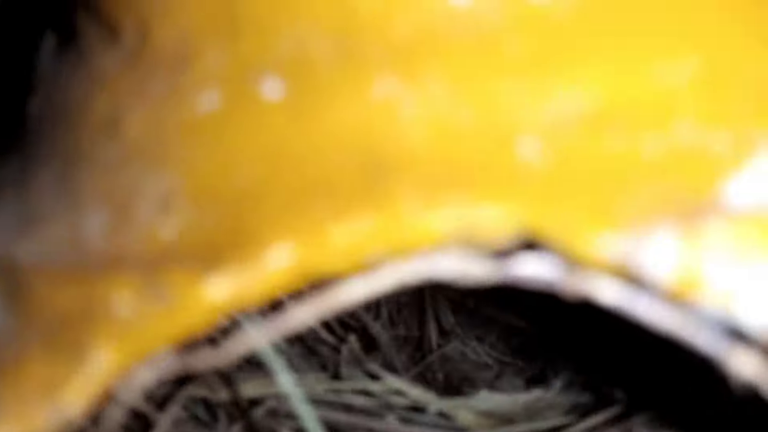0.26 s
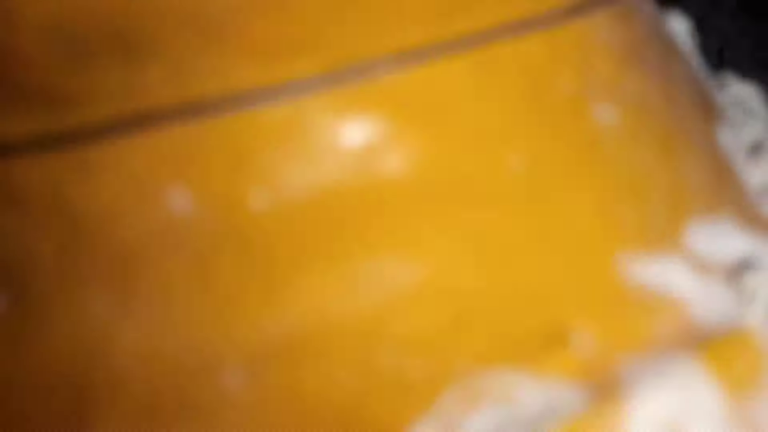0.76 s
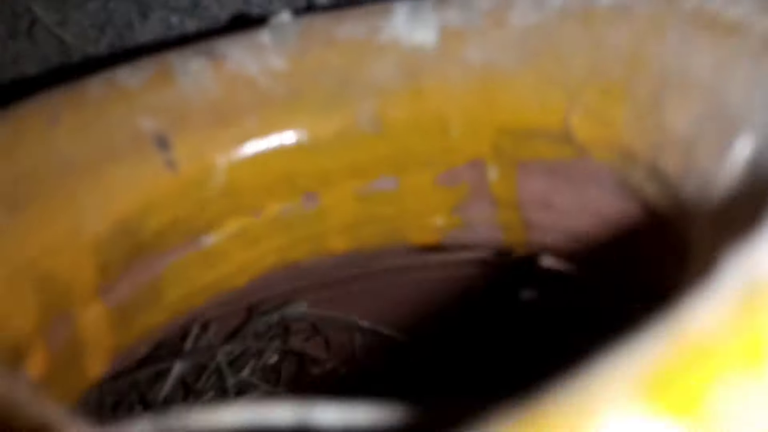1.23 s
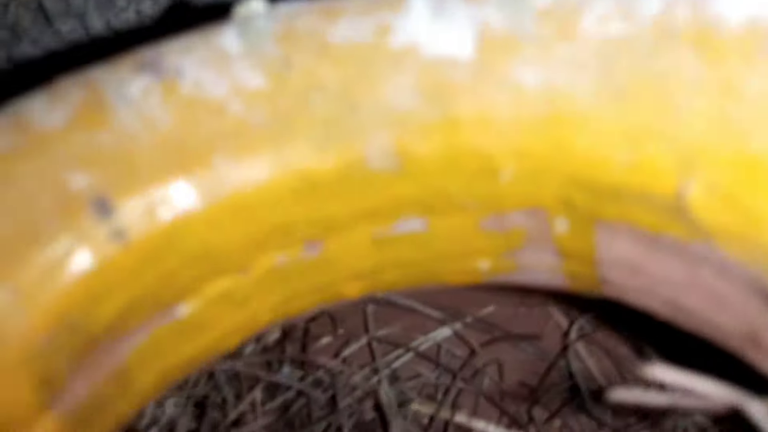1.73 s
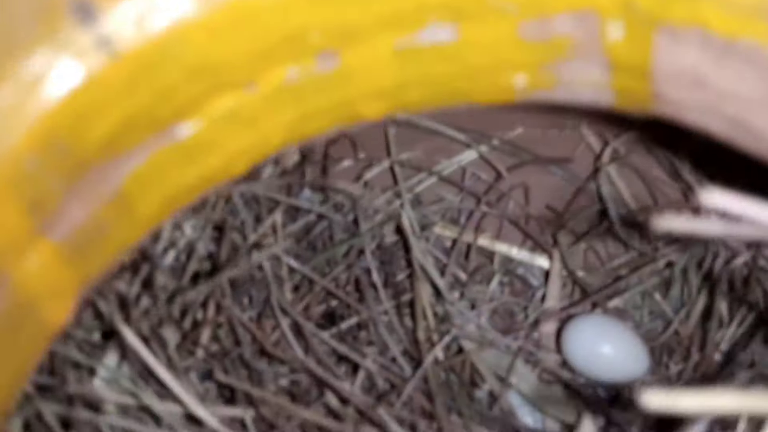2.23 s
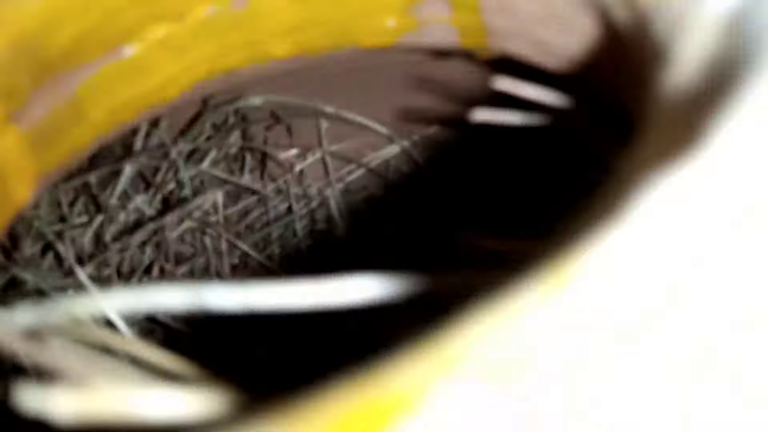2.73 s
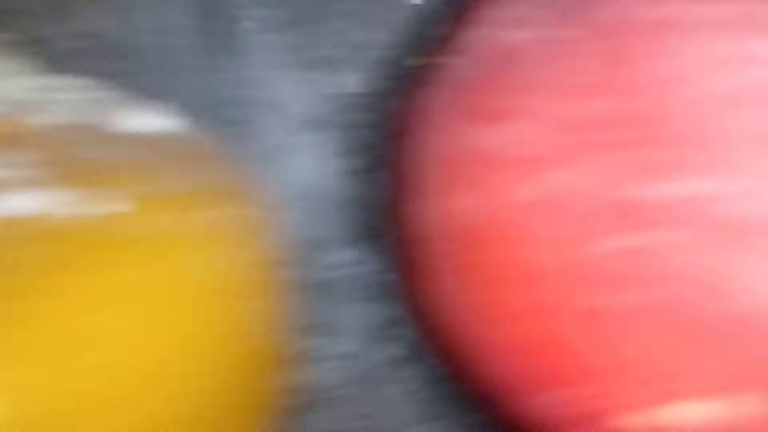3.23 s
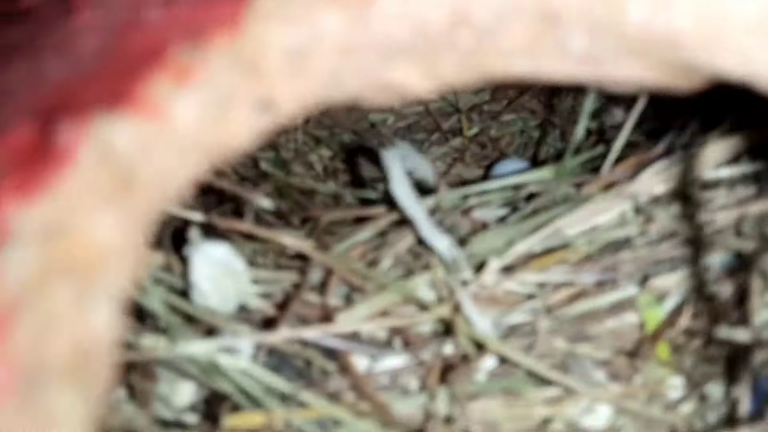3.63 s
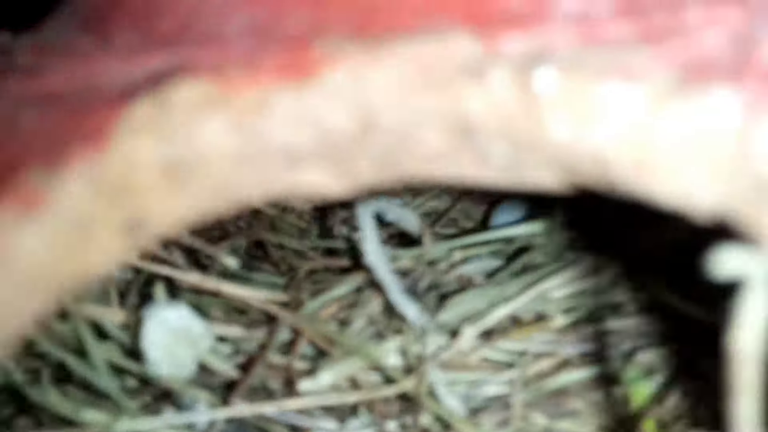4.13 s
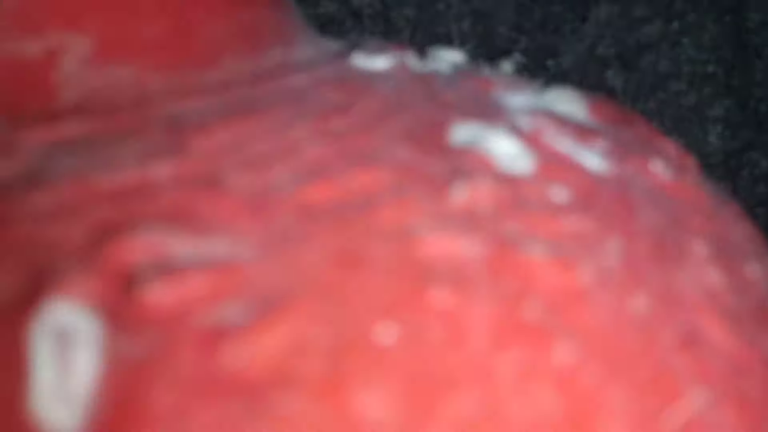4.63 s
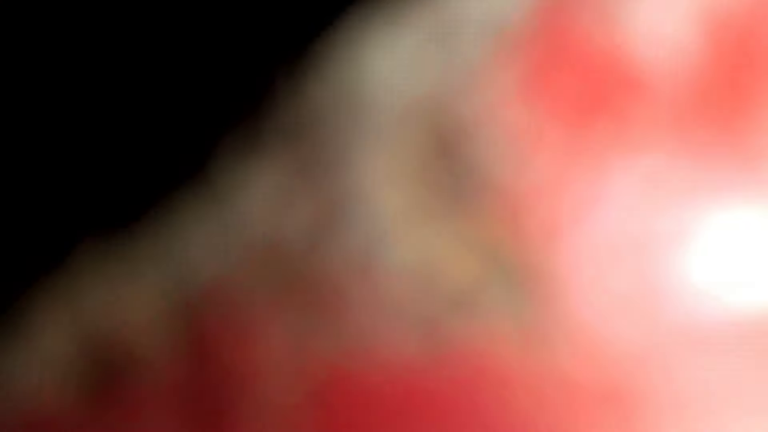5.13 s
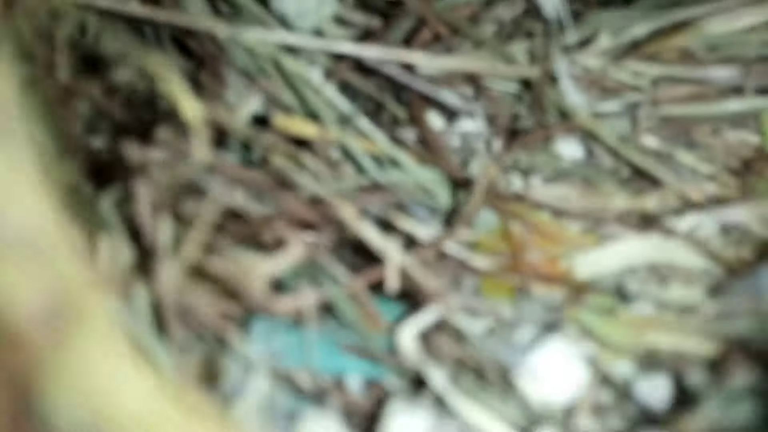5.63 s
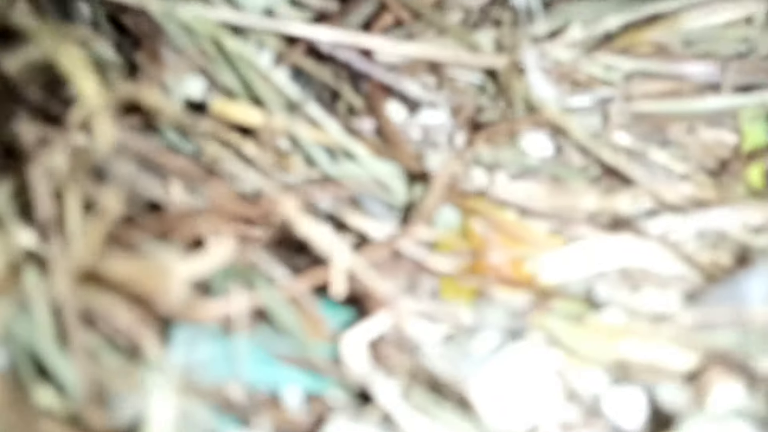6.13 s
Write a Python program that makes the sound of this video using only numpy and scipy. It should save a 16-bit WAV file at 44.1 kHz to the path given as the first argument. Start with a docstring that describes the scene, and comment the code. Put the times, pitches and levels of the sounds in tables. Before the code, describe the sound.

Thin chirps and grainy wing flaps echo off hard walls, with a rattling thud, dull clay knocks, and a busier, brighter finish.

```python
"""Small birds calling at a small microphone in a hard-walled aviary: whistles, cheeps, squawks, hoarse rasps.
Calls are gliding overtone stacks, rougher and breathier when harsh; wing beats are puffs of grainy hiss.
Close by, feet set clay nest pots ringing, and one heavy thud adds a sharp blow and rattling noise bands.
Behind lie moving air with low hollow notes, the soft flutter of many wings and the blur of far birds, all as
filtered noise; calls, wings and knocks echo off the walls, and the microphone's port brightens the top treble."""
import sys
import numpy as np
from scipy import signal
from scipy.fft import rfft, irfft
from scipy.io import wavfile
from scipy.ndimage import uniform_filter1d

SR = 44100
rng = np.random.default_rng(int(sys.argv[2]) if len(sys.argv) > 2 else 0)


def transcribe(u):
    """Save the signal u as a 16-bit wav file named by the first command-line argument.

    u: samples, shape (n,) or (channels, n), limited to [-1, 1]; the rate is SR.
    q: integer samples, one column per channel.
    """
    v = np.clip(np.atleast_2d(u).T, -1, 1)
    q = np.round(v * 32767).astype(np.int16)
    wavfile.write(sys.argv[1], SR, q)


def volts_from_db(level):
    """Convert decibel levels to linear amplitude ratios."""
    exponent = np.asarray(level, float) / 20
    return 10 ** exponent


N = 280476   # samples

# spectrum of bird breath and far chatter: [f/Hz, relative level/dB]
CHATTER_SPECTRUM = [(1200, -22.5), (2000, 1), (4000, 8.5), (7000, 6.5), (8500, -3.5), (16000, -20)]


def rms_one(x):
    """Scale to rms 1."""
    return x / np.sqrt(np.mean(x ** 2) + 1e-20)


def at_hz(points, hz):
    """Read a table on a log-frequency axis."""
    table = np.array(points)
    return np.interp(np.log(np.maximum(hz, 1)), np.log(table[:, 0]), table[:, 1])


def coloured(spectrum):
    """Steady noise with the given spectrum, rms 1."""
    shape = volts_from_db(at_hz(spectrum, np.fft.rfftfreq(N, 1 / SR)))
    return rms_one(irfft(rfft(rng.standard_normal(N)) * shape, N))


def drift(rate_hz):
    """Slow chance: noise twice through a one-pole low-pass, rms 1."""
    r = np.exp(-2 * np.pi * rate_hz / SR)
    wander = signal.lfilter([1], [1, -2 * r, r * r], rng.standard_normal(N + SR))
    return rms_one(wander[SR:])   # the first second only settles the filter


def ring(clicks, hz, t60):
    """A two-pole resonance: a unit click starts a sine of height about 1 that falls 60 dB in t60 seconds."""
    r, w = volts_from_db(-60 / (t60 * SR)), 2 * np.pi * hz / SR
    return signal.lfilter([0, np.sin(w)], [1, -2 * r * np.cos(w), r * r], clicks + 1e-18)


def clicks_at(seconds, sizes):
    """One sample per event."""
    return np.bincount(np.round(np.array(seconds) * SR).astype(int), sizes, N)[:N]


def chirps():
    """Gliding overtone stacks; a harsh call wavers more in pitch and strength and carries breath."""
    # calls by kind: [t/s, length/s, start f/Hz, end f/Hz, relative level/dB]
    whistles = [(1.412, 0.086, 2795, 3032, -39), (1.48, 0.078, 3020, 3510, -42.5),
                (2.04, .025, 3400, 3330, -42), (2.615, 0.06, 6530, 6610, -42.5),
                (3.057, 0.013, 1890, 2600, -31.5), (3.108, 0.013, 2586, 1800, -30),
                (3.124, 0.013, 1820, 2330, -38), (3.154, 0.0146, 4370, 6320, -22),
                (3.163, 0.047, 6370, 6270, -38), (3.171, 0.019, 5530, 5490, -37),
                (3.261, 0.01, 1640, 2830, -28), (3.27, 0.011, 2830, 1690, -34.5),
                (3.321, 0.029, 3060, 3083, -31.5), (3.494, 0.023, 2620, 2610, -44),
                (3.503, 0.0089, 6430, 6500, -42), (4.62, 0.011, 3120, 3080, -41.5),
                (5.213, 0.037, 5570, 5600, -16.5), (5.367, 0.04, 5980, 5320, -30.5),
                (5.475, 0.03, 3530, 3430, -47)]
    cheeps = [(.083, 0.033, 1734, 1840, -41), (.1, 0.026, 2090, 1985, -35), (.098, 0.044, 6270, 5775, -27),
              (.558, 0.037, 2647, 2529, -32), (.775, 0.015, 7160, 6930, -31),
              (.938, 0.044, 1777, 1800, -48.5), (1.01, 0.014, 2060, 2080, -51),
              (1.079, 0.025, 2126, 2280, -44), (1.156, 0.027, 2040, 2034, -42),
              (1.233, 0.022, 2072, 2008, -40), (1.322, 0.012, 2014, 2010, -41),
              (1.565, 0.09, 3256, 2806, -32), (2.815, 0.01, 6580, 5950, -44),
              (3.027, 0.039, 1815, 1970, -37), (3.655, 0.051, 2955, 3300, -29.5),
              (3.97, 0.056, 1914, 1930, -41.5), (4.282, 0.0276, 2106, 2286, -34),
              (4.35, 0.056, 2906, 2910, -25.5), (4.374, 0.028, 3160, 3124, -26),
              (4.399, 0.039, 3000, 2997, -26), (4.842, 0.054, 3130, 3240, -29),
              (4.88, 0.0496, 3130, 3077, -26.5), (4.915, 0.039, 3020, 2740, -45),
              (5.003, 0.074, 2970, 3096, -29), (5.775, 0.023, 4240, 4220, -32),
              (5.782, 0.037, 4800, 4760, -34.5), (6.019, 0.021, 6860, 6720, -29),
              (6.085, 0.057, 4150, 4430, -40), (6.157, 0.035, 6470, 7230, -17),
              (6.288, 0.035, 2293, 2280, -32.5), (6.3, 0.027, 5170, 5600, -17.5),
              (6.306, 0.028, 7200, 6700, -15)]     # reedy: the low ones rich in overtones, the high ones nearly single tones
    squawks = [(.546, 0.036, 2680, 2560, -29), (.674, 0.031, 2945, 3023, -35),
               (3.545, 0.025, 1770, 1800, -47), (3.565, 0.05, 1835, 2980, -47),
               (3.607, 0.033, 3520, 3670, -45), (4.083, 0.013, 2386, 2420, -37),
               (4.12, 0.023, 2200, 2390, -38), (5.035, 0.049, 2990, 2605, -31.5),
               (5.804, 0.06, 3950, 3850, -34), (5.838, 0.042, 4350, 3600, -39),
               (.87, 0.046, 3360, 3600, -53), (5.78, 0.08, 2300, 2550, -38),
               (5.808, 0.072, 2000, 1870, -37)]   # rough, mostly weak in overtones
    rasps = [(.1, 0.037, 4800, 5120, -37), (.68, 0.032, 6170, 5780, -44.5),
             (3.041, 0.053, 4700, 4900, -39.5), (3.087, 0.12, 4010, 3564, -40.5),
             (3.105, 0.034, 1812, 1857, -40), (3.765, 0.025, 2973, 3695, -39),
             (3.833, 0.03, 2634, 2930, -42), (3.891, 0.03, 2710, 3080, -39.5),
             (3.955, 0.041, 6550, 5810, -34.5), (3.99, 0.029, 4310, 3660, -37),
             (4.018, 0.026, 3920, 4670, -35.5), (4.083, 0.02, 4120, 4780, -31),
             (4.12, 0.041, 4150, 4450, -37), (4.142, 0.037, 6190, 5650, -34),
             (4.514, 0.0078, 6840, 6300, -41.5), (4.218, 0.0096, 2570, 2420, -44),
             (.563, 0.042, 3500, 3300, -38.5), (5.18, 0.02, 3224, 2945, -28.5),
             (6.009, 0.026, 2633, 2504, -36.5), (6.15, 0.043, 2660, 2760, -35)]       # hoarse
    low_tone = [(4.4, 0.33, 750, 715, -44), (4.725, .11, 720, 718, -42)]   # faint and wavering, from far off
    # overtone slope against the starting pitch: [f/Hz, slope/dB per overtone]
    thin_voice = [(750, -11), (1750, -18), (4300, -8), (5300, 4)]
    full_voice = [(1780, -2), (2100, 0.5), (2650, 6.5), (2950, 8.5), (3200, -1.5), (4000, -0.5), (4700, 6),
                  (7000, -14)]
    # pass band of the beak: [f/Hz, gain/dB]
    beak = [(1500, -3.5), (7000, 1.5), (8200, -23.5), (15000, -15.5)]
    clear, reedy, rough, hoarse = .24, .44, .65, .88   # harshness, 0-1
    kinds = [(whistles, clear, thin_voice), (cheeps, reedy, full_voice), (squawks, rough, thin_voice),
             (rasps, hoarse, full_voice), (low_tone, reedy, thin_voice)]

    out, waver, breath = np.zeros(N), drift(214), coloured(CHATTER_SPECTRUM)
    throb_db = 6.0 * drift(170).clip(-3, 1.3)
    for calls, harsh, voice in kinds:
        for s, length, start_hz, end_hz, level_db in calls:
            at = np.arange(round(s * SR), min(N, round((s + length) * SR)))
            way = (at / SR - s).clip(0) / length
            glide = 1 - (1 - way) ** 1.606   # quick at first, then settling
            pitch_hz = (start_hz + (end_hz - start_hz) * glide) * (1 + .062 * harsh * waver[at])
            turns = np.cumsum(pitch_hz) / SR
            rise = 0.093 + 1.05 * (1 - harsh) ** 2   # harsh calls burst out, clear ones swell
            swell = np.minimum(way / rise, (1 - way).clip(0) / 0.36).clip(0, 1)
            swell = swell * volts_from_db(level_db + throb_db[at] * np.sqrt(harsh))
            out[at] += swell * harsh ** 4 * breath[at]
            slope_db = at_hz(voice, start_hz)
            for k in range(1, int(14000 / max(start_hz, end_hz)) + 1):
                steps = min(k, 7500 / start_hz) - 1   # the slope holds up to the beak's pass band
                overtone_db = slope_db * steps + at_hz(beak, k * start_hz)
                out[at] += swell * volts_from_db(overtone_db) * np.sin(2 * np.pi * k * turns)
    return out


def wings():
    """Each beat is a grainy puff of feather hiss; strong strokes swell and die more slowly; far wings come at random."""
    # near wing beats: [t/s, relative treble level/dB]
    beats = [(0.156, -26.5), (.238, -35), (.344, -35), (0.459, -30.5), (0.528, -30), (0.572, -27.5),
             (0.945, -32), (0.971, -31.5), (1.132, -30.5), (1.224, -29.5), (1.393, -37.5), (1.521, -31.5),
             (1.556, -34), (1.741, -35.5), (1.826, -34), (1.907, -31.5), (1.96, -31), (1.997, -33.5),
             (2.043, -30.5), (2.205, -29), (2.288, -36.5), (2.511, -32), (2.554, -30.5), (2.593, -27.5),
             (2.82, -34.5), (2.842, -27.5), (2.915, -26.5), (3.122, -21.5), (3.144, -25), (3.229, -28),
             (3.308, -31), (3.334, -28.5), (3.397, -25), (3.445, -32.5), (3.621, -30), (3.649, -21),
             (3.907, -28.5), (3.953, -31), (4.259, -32), (4.316, -29.5), (4.358, -25), (4.465, -33.5),
             (4.514, -32), (4.727, -32), (5.028, -26), (5.051, -23.5), (5.086, -26), (5.127, -19.5),
             (5.149, -31), (5.567, -22.5), (5.659, -31.5), (5.914, -30.5), (6.015, -34), (6.068, -31),
             (6.296, -19)]
    # feather hiss, middle and top: [f/Hz, relative level/dB]
    feather_mid = [(300, -3.5), (1500, 5.5), (3000, 4), (7500, 8.5), (9000, -31)]
    feather_top = [(5000, -47), (7500, -5.5), (16000, -2)]
    rise_s, fall_s = 0.0049, 0.0081   # time constants of a -31.5 dB stroke
    stretch = 0.33                    # share of the level difference that lengthens a stroke
    far_per_s, far_db = 2, -47
    mid_db, mid_spread_db = -2.5, 1.8   # middle band against the treble, and its wandering

    far = [(s, far_db) for s in rng.uniform(0, N / SR, round(far_per_s * N / SR))]
    t, top = np.arange(SR // 10) / SR, np.zeros(N + SR)
    for s, treble_db in [*beats, *far]:
        slow = volts_from_db(stretch * (treble_db + 31.5))
        start = max(0, round((s - rise_s * (slow - 1)) * SR))   # a slower rise begins earlier
        puff = (1 - np.exp(-t / slow / rise_s)) * np.exp(-t / slow / fall_s)
        top[start:start + len(t)] += volts_from_db(treble_db) * puff
    top = top[:N]
    mid = top * volts_from_db(mid_db + mid_spread_db * drift(11.0))
    grain = volts_from_db(3.0 * drift(150))
    return grain * (top * coloured(feather_top) + mid * coloured(feather_mid))


def pots():
    """A foot lands with a second, weaker touch; hardness tilts the upper modes, and some landings catch the rim."""
    # feet on the pots: [t/s, relative level/dB, hardness/dB per octave above 260 Hz, rim against the blow/dB]
    knocks = [(0.391, -32, -17, -14), (0.511, -42, 9, -6), (.536, -30.5, -15, -20), (.55, -22.5, -25, -24),
              (0.566, -18, -29, -23), (0.587, -25, -21, -33), (1.52, -50, 18.5, -22),
              (1.983, -54.5, 25.5, 9), (3.344, -25.5, -2.5, 6), (3.904, -31, 11.5, 6),
              (4.052, -27.5, -33, -30), (5.524, -57, 29.5, 17), (6.0, -15.5, -53, -35),
              (6.174, -18.5, 10, -9)]
    # modes of the clay body, then of the glazed rim: [f/Hz, relative level/dB, t60/s]
    body_modes = [(215.6, -11.5, 0.33), (280.5, 5, 0.055), (328, -3.5, 0.064), (418, 1, 0.034),
                  (485, -3, 0.067), (870, -10.5, 0.0047)]
    rim_modes = [(1430, -7, 0.27), (1591, -12.5, 0.1)]
    s, blow_db, hard_db, rim_db = np.transpose(knocks)
    out, later = 0, rng.uniform(0.0045, 0.0109, len(s))   # delay of the second touch, s
    for hz, level_db, t60 in body_modes:
        sizes = volts_from_db(blow_db + level_db + hard_db * np.log2(hz / 260).clip(0))
        touches = clicks_at(s, sizes) + clicks_at(s + later, .5 * sizes)
        out = out + ring(touches, hz, t60)
    for hz, level_db, t60 in rim_modes:
        out = out + ring(clicks_at(s, volts_from_db(blow_db + level_db + rim_db)), hz, t60)
    no_bass = signal.butter(2, 170, "high", fs=SR, output="sos")   # a small pot radiates no bass
    return signal.sosfilt(no_bass, out)


def thud():
    """A sharp blow, then a hollow body that rattles on band by band."""
    # bands of the body: [f/Hz, relative level/dB, t60/s]
    body_bands = [(93, 4.5, 0.23), (170, 13.5, 0.1), (280, 6, 0.18), (434, 7, 0.12), (627, 19, 0.019),
                  (1160, 17.5, 0.0099), (2280, 4, 0.012)]
    thud_s, thud_db = .7836, -16
    t = (np.arange(N) / SR - thud_s).clip(0)
    blow, out = clicks_at([thud_s], [1.]), 0
    for hz, level_db, t60 in body_bands:
        band = signal.butter(1, [hz / 1.25, hz * 1.25], "band", fs=SR, output="sos")
        noise = rms_one(signal.sosfilt(band, rng.standard_normal(N)))
        rattle = 0.39 * noise * (t > 0) * volts_from_db(-60 * t / t60)
        knock = ring(blow, hz, 6.0 / hz)   # gone within six periods
        out = out + volts_from_db(thud_db + level_db) * (rattle - knock)
    return out


def soft(x):
    """A padded contact gives no sharp click: low-pass at 2600 Hz."""
    return signal.sosfilt(signal.butter(3, 2600, fs=SR, output="sos"), x)


def stir():
    """Lumpy air on the port, the soft rustling flutter of many wings and the blur of far birds."""
    # the flock's stir, levels before their wandering: [t/s, air/dB, wing flutter/dB, far chatter/dB]
    stirring = [(0, -39, -46.5, -52.5), (.3, -46, -51.5, -59), (1.6, -49, -49, -56.5),
                (1.75, -43, -48, -52.5), (2.28, -42, -46, -56), (2.36, -51, -46.5, -79),
                (2.47, -43, -44.5, -56), (2.58, -40.5, -48, -41), (2.75, -48, -48, -55.5),
                (3.0, -51, -48, -52.5), (3.6, -43, -48.5, -56), (3.8, -36.5, -43.5, -39),
                (4.2, -44.5, -49.5, -50), (4.55, -48.5, -57, -61), (4.8, -41, -48, -55),
                (5.02, -39, -46.5, -50), (5.08, -28, -29, -28), (5.3, -26.5, -36, -40),
                (5.6, -34.5, -30.5, -46.5), (5.75, -37.5, -40.5, -52.5), (6.36, -29, -37.5, -34)]
    # noise spectra: [f/Hz, relative level/dB]
    air_spectrum = [(30, 5), (60, -6.5), (91, 1.5), (250, -17), (500, -29), (1500, -60)]
    flutter_spectrum = [(120, -5.5), (180, -1.5), (450, -2), (750, -7), (1100, -11.5), (3000, -16.5),
                        (5000, -25.5), (9000, -31)]
    s, *levels = np.transpose(stirring)
    air_db, flutter_db, chatter_db = [np.interp(np.arange(N) / SR, s, c) for c in levels]
    lumps = volts_from_db(2.0 + 2.83 * drift(29.0))
    air = volts_from_db(air_db) * (lumps * coloured(air_spectrum) + hollows())
    flutter = volts_from_db(flutter_db + 2.5 * drift(8) + 2.5 * drift(40)) * coloured(flutter_spectrum)
    chatter = volts_from_db(chatter_db + 3.0 * drift(25)) * coloured(CHATTER_SPECTRUM)
    return air + flutter + chatter


def hollows():
    """Moving air keeps the enclosure's lowest resonances wavering."""
    # low notes of the enclosure: [f/Hz, level before its wavering/dB, t60/s]
    low_notes = [(90.4, -6.5, 0.32), (129.4, -6, 0.16), (203.6, -8.5, 0.2)]
    out = 0
    for hz, level_db, t60 in low_notes:
        out = out + volts_from_db(level_db + 2.0 * drift(3)) * rms_one(ring(rng.standard_normal(N), hz, t60))
    return out


def aviary(x):
    """Dense echoes off the walls: noise that dies at its own rate in each octave."""
    # decay of the echoes: [f/Hz, t60/s]
    wall_t60 = [(200, 0.41), (3000, 0.2), (7000, 0.19), (14000, 0.13)]
    t, echo = np.arange(SR // 2) / SR, 0
    for hz in 125 * 2. ** np.arange(8):
        edges = [hz / np.sqrt(2), min(hz * np.sqrt(2), .45 * SR)]
        octave = signal.butter(2, edges, "band", fs=SR, output="sos")
        noise = signal.sosfilt(octave, rng.standard_normal(len(t)))
        echo = echo + noise * volts_from_db(-60 * t / at_hz(wall_t60, hz))
    echo = echo * (t > .004)   # the walls answer after 4 ms
    return signal.fftconvolve(x, echo / np.sqrt(np.sum(echo ** 2)))[:N]


def scene():
    """Calls and wings ring strongly off the walls; pots and thud are close and much drier."""
    calls, beats, close = chirps(), wings(), soft(pots() + thud())
    wet = aviary(volts_from_db(0.5) * calls + volts_from_db(-0.5) * beats + volts_from_db(-15.5) * close)
    return (volts_from_db(3.5) * calls + beats + close + wet + stir())[None]


def gain_control(x, knee_db, squeeze, release_db_per_s):
    """Loud sound pulls the gain down by a share of its excess over the knee; it climbs back steadily."""
    level_db = 10 * np.log10(uniform_filter1d(x ** 2, size=1200) + 1e-12)
    over = squeeze * (level_db - knee_db).clip(0)
    slope = release_db_per_s * np.arange(N) / SR
    held = np.maximum.accumulate(over + slope, axis=-1) - slope
    return x * volts_from_db(-uniform_filter1d(held, size=200))


def low_pass(x):
    """Removes everything above the highest recorded frequency."""
    return signal.sosfilt(signal.butter(12, 16970, fs=SR, output="sos"), x)


def record(dry):
    """The microphone colours the sound causally (minimum phase), then come gain control and a soft ceiling."""
    # response of the microphone and its port: [f/Hz, gain/dB]
    microphone = [(25, -39), (55, -7.5), (4000, -1), (6200, 0.5), (7300, -3), (8500, -5), (13500, -15.5),
                  (15000, -3.5), (15900, -3), (16400, -83)]
    size = 4096
    cepstrum = irfft(np.log(volts_from_db(at_hz(microphone, np.fft.rfftfreq(size, 1 / SR)))))
    cepstrum[1:size // 2] *= 2   # folding the cepstrum forward makes the phase minimal
    cepstrum[size // 2 + 1:] = 0
    response = irfft(np.exp(rfft(cepstrum)))
    heard = signal.fftconvolve(dry, response[None])[:, :N]
    heard = gain_control(heard, knee_db=-36, squeeze=.3, release_db_per_s=70)
    mix = .55 * np.tanh(heard / .55)
    return low_pass(mix)


dry = scene()
out = record(dry)
transcribe(out)
```